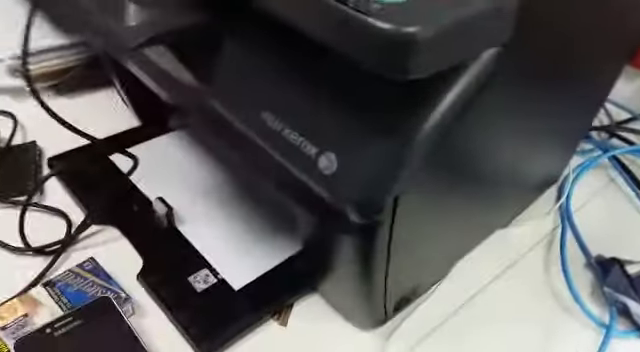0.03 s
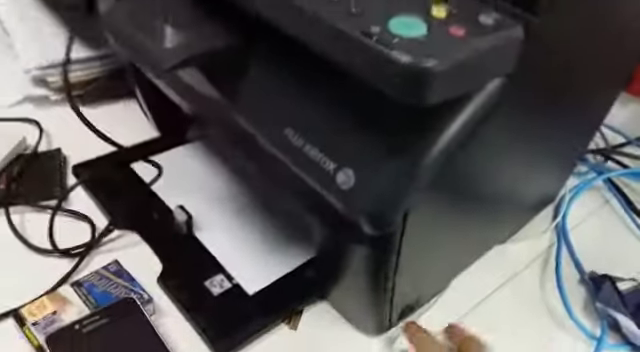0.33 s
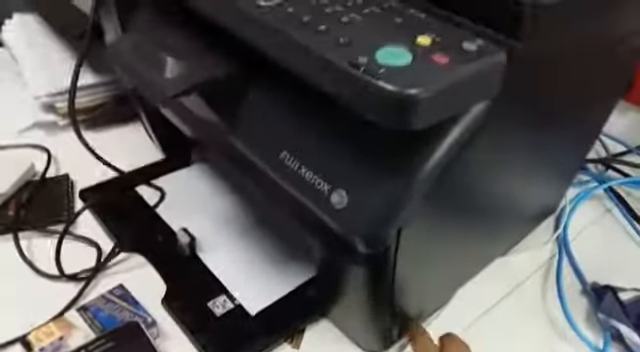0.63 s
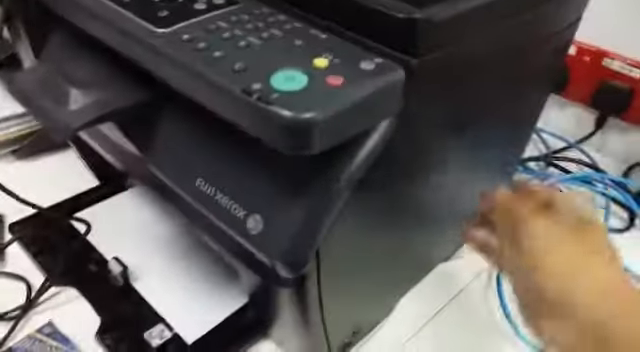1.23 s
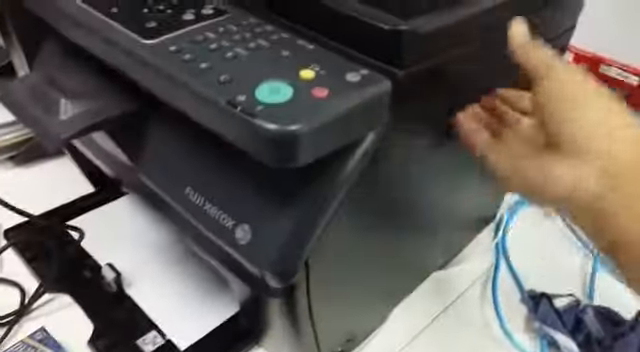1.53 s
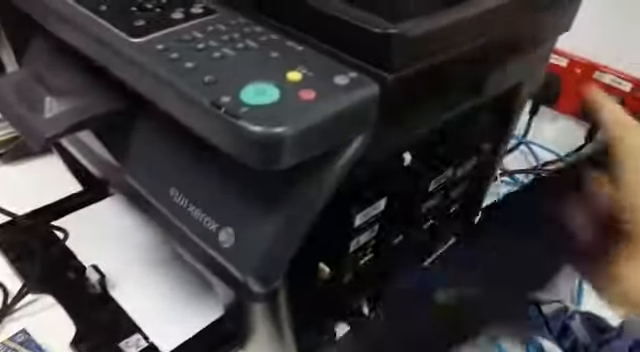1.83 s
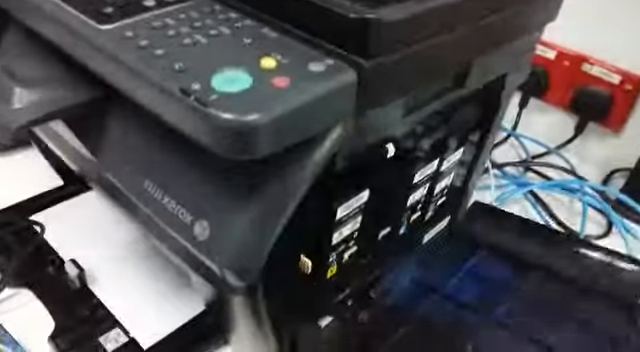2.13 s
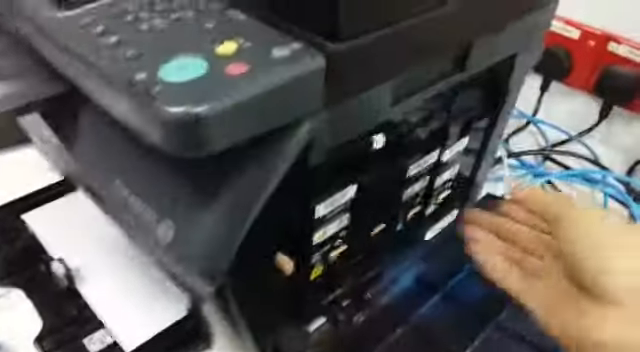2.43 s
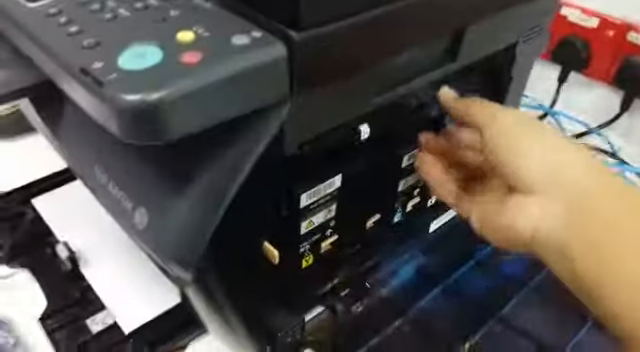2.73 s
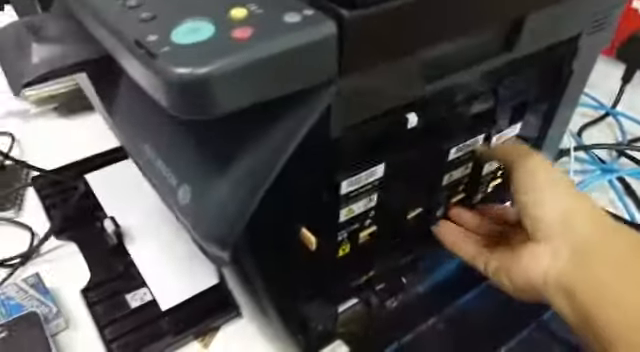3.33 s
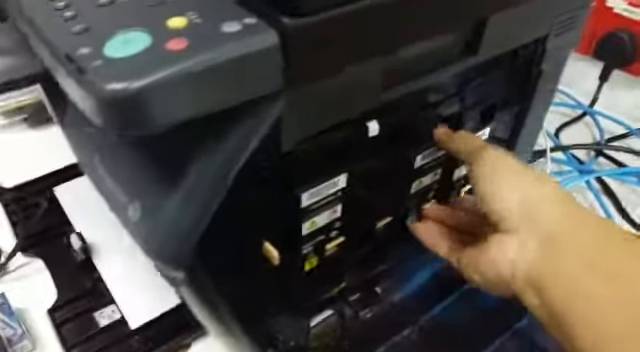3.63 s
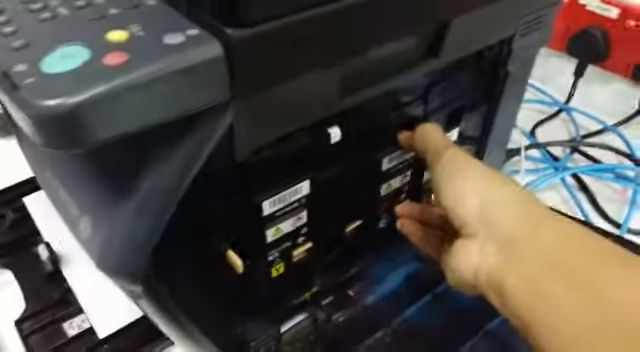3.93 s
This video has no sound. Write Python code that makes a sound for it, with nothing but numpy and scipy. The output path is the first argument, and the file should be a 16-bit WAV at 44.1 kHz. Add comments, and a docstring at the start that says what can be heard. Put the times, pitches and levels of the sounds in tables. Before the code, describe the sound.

A jammed printer's gears grind loudly, then stop, and its plastic panel clatters open.

```python
"""A jammed office printer's drive gear skips 47 teeth a second, rattling the plastic case, then stalls.
A hand unlatches the side panel, which swings down and knocks against its stop; fingers tick and rub
inside and a lever snaps over. A small room answers. Air hisses throughout; a low rumble fades away
and returns once the panel is open."""
import sys
import numpy as np
from scipy import signal
from scipy.fft import rfft, irfft, next_fast_len
from scipy.io import wavfile

SR = 44100
rng = np.random.default_rng(int(sys.argv[2]) if len(sys.argv) > 2 else 0)


def wav_out(sig):
    """Save sig, one row per channel (or a flat mono array), as 16-bit PCM at SR to the path in sys.argv[1]."""
    wavfile.write(sys.argv[1], SR, np.round(np.clip(np.atleast_2d(sig).T, -1, 1) * 32767).astype(np.int16))


N = 176400
FFT_N, RESPONSE_N = next_fast_len(N + SR), SR // 2
HZ = np.fft.rfftfreq(FFT_N, 1 / SR)
TIME_S, AGE_S = np.arange(N) / SR, np.arange(RESPONSE_N) / SR

# room decay: f/Hz, t60/s
ROOM_T60_S = [(150, 0.13), (600, 0.21), (4000, 0.17), (12000, 0.16)]
# left-right likeness: f/Hz, correlation
COHERENCE = [(100, 0.95), (300, 0.93), (600, 0.61), (1200, 0.14), (4000, 0.15)]
# air spectrum: f/Hz, level/dB
AIR_EQ = [(25, -32), (70, 1.5), (130, 3.5), (500, 7), (900, 3), (1700, -4), (2500, -4.5), (3400, -12.5),
          (5200, -16.5), (6500, -29), (9000, -35), (15800, -39)]
# rumble spectrum: f/Hz, level/dB
RUMBLE_EQ = [(25, -41), (65, -0.5), (115, 4.5), (170, -1), (300, 0.5), (600, -9), (1200, -16), (2500, -68)]
# rumble envelope: t/s, level/dB
RUMBLE_DB = [(0, -47.5), (2.38, -60), (2.44, -45.5), (2.62, -46), (2.7, -42), (2.95, -45.5), (3.3, -44.5),
             (4, -43)]
# hand and hinge rub spectrum: f/Hz, level/dB
RUB_EQ = [(300, -16), (1500, 8.5), (1850, 0), (2250, 7.5), (3000, 2), (4450, 0), (5400, -5), (6500, -7),
          (9000, -25.5), (15000, -29)]
# rub envelope: t/s, level/dB
RUB_DB = [(1.5, -72), (1.64, -45), (1.69, -56), (1.87, -54.5), (2.06, -48.5), (2.3, -58.5), (3.15, -71),
          (3.33, -50), (3.46, -53), (3.58, -55), (3.8, -58), (3.94, -57), (3.97, -45)]
# finger ticks: t/s, level/dB, treble/dB
FINGER_TICKS = [(2.6898, -9.5, -20), (2.7513, -19.5, -22), (3.17, -19, -7), (3.298, -17, -9),
                (3.5782, -22, 1), (3.712, -19.5, -10), (3.8486, -9.5, -4)]
# lever snap and rebound: t/s, level/dB
LEVER_HITS = [(3.8545, 6), (3.8554, 6.5), (3.8574, -1)]
# lever spectrum: f/Hz, level/dB
LEVER_EQ = [(100, -47), (300, -20), (900, -9), (1400, -8.5), (1820, -7.5), (2060, 0.5), (2330, -6),
            (2750, -7), (3150, -2), (4500, -7), (5150, -2.5), (6200, -15.5), (8200, -22.5), (15800, -38)]
# case modes under the lever: f/Hz, level/dB, t60/s
CASE_MODES = [(118, -38, 0.55), (174, -37.5, 0.22), (242, -15.5, 0.071), (277, -34.5, 0.34)]
# panel knocks: t/s, level/dB, bass/dB, treble/dB, rattle t60/s, ring/dB
PANEL_KNOCKS = [(1.5016, -1.5, -21, -10, .12, -14), (1.513, -7, -5, -6, 0.029, -10),
                (1.594, -12, -5, -15, 0.068, -6.5), (1.650, -17.5, -23, -6, 0.068, 1.5),
                (1.725, -12, -15, 3, 0.2, -4.5), (1.737, -17, -19, 5.5, 0.041, 3),
                (1.783, -9, 1.5, -7, 0.056, -3), (1.817, -18, -11, -5, 0.08, -5),
                (1.8878, -5, 0, -6.5, .12, -11), (2.083, -6.5, -18, 10, .052, -12),
                (2.0998, -2, 0.5, -2, 0.048, -0.5), (2.1416, 0, 2, 18.5, .042, -10),
                (2.17, -10.5, 1, -4, 0.023, 0), (2.178, 2, -5, -3, 0.038, 1),
                (2.3278, -13, 0.5, -6, 0.075, 2)]
# panel clatter spectrum: f/Hz, level/dB
PANEL_EQ = [(60, -27), (250, -5), (800, 2.5), (1200, -2), (2300, -8), (3500, -10.5), (4400, -9),
            (9000, -32), (15000, -53)]
# hollow panel modes: f/Hz, width/Hz, level/dB
SHELL_MODES = [(805, 60, 2), (1432, 50, -3), (1560, 50, -5), (1850, 40, -8), (2210, 60, -3),
               (4630, 130, -14)]
# gear speed: t/s, tooth rate/Hz
TOOTH_RATE_HZ = [(0, 47.7), (.1, 47.7), (.13, 47.05), (.3, 47.15), (.36, 47.45), (.72, 47.55), (.8, 47.3),
                 (1.07, 47.2)]
# gear load: t/s, level/dB
LOAD_DB = [(0, -.7), (1.1, .5)]
# last slips at the stall: t/s, level/dB
STALL_SLIPS = [(1.085, -1), (1.1279, 0)]
# gear frame modes: f/Hz, width/Hz, level/dB
FRAME_MODES = [(1000, 90, -8), (1180, 120, -12), (1400, 70, -1), (1520, 50, 1.5), (1820, 60, -6),
               (2100, 80, -8), (2440, 60, -1), (2550, 60, 2), (3680, 120, -6)]
# tooth chirp filter: f/Hz, level/dB
CHIRP_EQ = [(2550, 0), (3100, -7), (3650, 0)]
# tooth snap spectrum: f/Hz, level/dB
SNAP_EQ = [(60, -57), (1100, -1), (1700, -3), (3000, -0.5), (4200, -3), (5050, -0.5), (5700, -2),
           (6700, -4.5), (7500, -10.5), (7900, -11), (10500, -18), (13000, -17), (15800, -36)]
# tooth scrape spectrum: f/Hz, level/dB
GRIT_EQ = [(30, -30), (250, -15.5), (700, -1), (1500, 1), (2500, -3.5), (7200, -4), (8000, -10.5),
           (15800, -26.5)]
# thin ring after each rebound: t/s, level/dB
SQUEAL_DB = [(0, -33), (.7, -27), (.95, -19.5), (1.13, -18)]
# case drone: multiple of tooth rate, level/dB
DRONE_ORDERS = [(2, -14), (3, -4.5), (4, -15), (5, 0), (6, -4), (7, -6), (8, -13), (9, -14), (10, -6),
                (11, -5), (12, -13), (13, -5), (14, -4), (15, -8), (16, -10), (17, -11), (18, -5), (19, -2),
                (20, -8), (21, -4)]
# gear balance: f/Hz, left minus right/dB
GEAR_PAN_DB = [(700, 3), (1400, -2), (2600, -4), (3700, -3.5), (5000, 3.5), (6700, 6.5), (9000, 4.5),
               (13000, 8)]


def amp(db):
    """dB to gain."""
    return 10 ** (np.asarray(db) / 20)


def unit(x):
    """Scale to rms 1."""
    return x / np.sqrt(np.mean(np.abs(x) ** 2) + 1e-20)


def over_hz(rows, hz=HZ):
    """Interpolate on a log frequency axis."""
    f, value = np.transpose(rows)
    return np.interp(np.log(hz + 1), np.log(f + 1), value)


def over_time(rows, t_s=TIME_S):
    """Interpolate in time."""
    return np.interp(t_s, *np.transpose(rows))


def decay(t60_s, t_s=AGE_S):
    """Exponential decay."""
    return np.exp(-np.log(1000) * t_s / np.maximum(t60_s, 1e-4))


def min_phase(db):
    """Causal unit-energy response from a gain curve."""
    cepstrum = irfft(np.log(unit(amp(db)) + 1e-6), FFT_N)
    cepstrum[1:FFT_N // 2] *= 2
    cepstrum[FFT_N // 2 + 1:] = 0
    return np.exp(rfft(cepstrum))


def resonances(modes):
    """Causal response of modes with alternating sign."""
    return sum((-1) ** k * amp(db) * 1j * HZ * width / (hz * hz - HZ * HZ + 1j * HZ * width)
               for k, (hz, width, db) in enumerate(modes))


def shelves_db(bass_db, treble_db):
    """Gain curve of a softer or harder contact."""
    return over_hz([(700, bass_db), (2000, 0), (3000, 0), (8000, treble_db)])


def pan(db):
    """Stereo gains from left minus right."""
    return unit(amp(np.array([db, -db]) / 2).reshape(2, -1))


def spread(spectra):
    """Two unrelated spectra to stereo, alike in the bass."""
    angle = np.arccos(np.clip(over_hz(COHERENCE), -1, 1)) / 2
    mid, side = spectra[0] * np.cos(angle), spectra[1] * np.sin(angle)
    return np.array([mid + side, mid - side])


def samples(spectrum):
    """Spectrum to samples."""
    return irfft(spectrum, FFT_N)[..., :N]


def pulses(times_s, gains):
    """Spectrum of sharp contacts, as windowed sincs."""
    centres = np.asarray(times_s)[:, None] * SR
    taps = np.floor(centres).astype(int) + np.arange(-7, 9)
    weights = np.sinc(taps - centres) * np.sinc((taps - centres) / 8) * np.asarray(gains)[:, None]
    return rfft(np.bincount((taps % FFT_N).ravel(), weights.ravel(), FFT_N))


def noise(eq):
    """Steady stereo noise, rms 1."""
    white = spread(rfft(rng.standard_normal((2, FFT_N))))
    return unit(samples(white * amp(over_hz(eq))))


def rattle(t60_s, room_db, swell_s=0.0067):
    """Stereo response to one blow: dense rattle plus room tail."""
    rise = 1 - decay(swell_s)
    near = rng.standard_normal((2, RESPONSE_N)) * decay(t60_s) * rise
    for _ in range(3):  # whiten, then restore a decaying shape
        spectrum = rfft(near)
        flat = irfft(spectrum / (np.abs(spectrum) + 1e-9), RESPONSE_N)
        near = flat * (AGE_S < RESPONSE_N / SR / 2) * decay(10 * t60_s) * rise
    hz, t_s, bands = signal.stft(rng.standard_normal((2, RESPONSE_N)), SR, nperseg=256)
    bands = bands * decay(over_hz(ROOM_T60_S, hz)[:, None], t_s)
    tail = signal.istft(bands, SR, nperseg=256)[1][:, :RESPONSE_N] * (1 - decay(0.051))
    return unit(spread(rfft(unit(near) + amp(room_db) * unit(tail), FFT_N)))


def background(air_db=-46, hum_hz=120.7, hum_db=-61):
    """Room air, faint hum, low rumble."""
    air = amp(air_db) * noise(AIR_EQ)
    hum = amp(hum_db) * np.sin(2 * np.pi * hum_hz * TIME_S)
    rumble = amp(over_time(RUMBLE_DB)) * noise(RUMBLE_EQ)
    return air + hum + rumble


def rubbing():
    """Hand and hinge rub on plastic."""
    return amp(over_time(RUB_DB)) * noise(RUB_EQ)


def lever():
    """Fingers tick on a plastic lever; it snaps over and thumps the case."""
    eq_db = over_hz(LEVER_EQ)
    ticks = sum(pulses([t_s], [amp(db)]) * min_phase(eq_db + shelves_db(0, treble_db))
                * rattle(t60_s=0.019, room_db=-8.5) for t_s, db, treble_db in FINGER_TICKS)
    snap = sum(pulses([t_s], [amp(db)]) * rattle(t60_s=0.0115, room_db=-6.5, swell_s=0.0024)
               for t_s, db in LEVER_HITS) * min_phase(eq_db)
    ring = sum(amp(db) * np.sin(2 * np.pi * hz * AGE_S) * decay(t60_s) for hz, db, t60_s in CASE_MODES)
    thump = pulses([LEVER_HITS[0][0]], [1]) * rfft(ring * (1 - decay(0.052)), FFT_N)
    return samples((ticks + snap) * pan(db=-1) + thump)


def panel(shell_rattle_db=-5):
    """The panel unlatches and bounces on its stop; each knock rattles it and rings its hollow shell."""
    shell, knocks = resonances(SHELL_MODES), 0
    for t_s, db, bass_db, treble_db, t60_s, ring_db in PANEL_KNOCKS:
        contact = min_phase(shelves_db(bass_db, treble_db))
        colour = unit(contact * min_phase(over_hz(PANEL_EQ)))
        clatter = colour * rattle(t60_s, room_db=-4, swell_s=0.0074)
        ring = unit(contact * shell) * (1 + amp(shell_rattle_db) * rattle(t60_s, room_db=-7))
        knocks = knocks + pulses([t_s], [amp(db)]) * (clatter + amp(ring_db) * ring)
    return samples(knocks * pan(db=-2.5))


def case_drone(teeth, t60_s=0.42):
    """The case drones at multiples of the tooth rate, dying away at the stall."""
    drone = 0
    for order, db in DRONE_ORDERS:
        cycles = order * teeth + rng.random()
        stereo_offset = np.array([[0], [order * 0.0096]]) * rng.normal()
        drone = drone + amp(db) * np.sin(2 * np.pi * (cycles + stereo_offset))
    return drone * decay(t60_s, np.maximum(TIME_S - STALL_SLIPS[0][0], 0))


def tooth_chirp(start_hz=2150, end_hz=5400, length_s=0.005):
    """Spectrum of the rising chirp as one tooth rides over the next."""
    progress = np.minimum(AGE_S / length_s, 1)
    hz = start_hz + (end_hz - start_hz) * progress
    envelope = np.sqrt(np.abs(np.sin(np.pi * progress))) * (1 - progress / 2)
    sweep = np.sin(2 * np.pi * np.cumsum(hz) / SR) * envelope
    return unit(rfft(sweep, FFT_N) * amp(over_hz(CHIRP_EQ)))


def frame_strike(hits, direct, highpass_hz=900):
    """Teeth ring and rattle the gear frame."""
    highpass = (1j * HZ / (highpass_hz + 1j * HZ)) ** 2
    frame = unit(resonances(FRAME_MODES) * highpass)
    return hits * frame * (direct + amp(-6) * rattle(t60_s=0.016, room_db=-0.5, swell_s=0.0025))


def tooth_snap(hits, wall_lag_s=0.0095, wall_db=-11.5):
    """Bright snap with one wall reflection."""
    snap = hits * min_phase(over_hz(SNAP_EQ)) * rattle(t60_s=0.026, room_db=5, swell_s=0.0025)
    return snap * pulses([0, wall_lag_s], [1, amp(wall_db)])


def tooth_squeal(hits, direct, hz=5020):
    """Thin ring after each rebound."""
    ring = rfft(np.sin(2 * np.pi * hz * AGE_S) * decay(t60_s=0.025), FFT_N)
    return hits * ring * (direct + rattle(t60_s=0.026, room_db=0))


def tooth_scrape(hits):
    """One burst of gritty noise per tooth."""
    envelope = unit(np.abs(samples(hits * rfft(decay(t60_s=0.066), FFT_N))))
    grit = rfft(envelope * rng.standard_normal((2, N)), FFT_N)
    return spread(grit) * min_phase(over_hz(GRIT_EQ))


def gear(first_s=0.005, stall_s=1.07, snap_lag_s=0.0013, rebound_lag_s=0.0037, ear_lag_s=0.00013):
    """Each skipping tooth chirps, strikes the frame, snaps, rebounds and scrapes; the case drones."""
    teeth = np.cumsum(over_time(TOOTH_RATE_HZ)) / SR
    count = int(teeth[int(stall_s * SR)]) + 1
    skips_s = first_s + np.interp(np.arange(count), teeth, TIME_S)
    late_s, late_db = np.transpose(STALL_SLIPS)
    gains = amp(np.r_[over_time(LOAD_DB, skips_s), late_db])
    skips_s = np.r_[skips_s, late_s]

    def hits(lag_s, jitter_s, db=0, scatter_db=0.3):
        """One pulse per skip, scattered in time and level."""
        timing, level = rng.standard_normal((len(skips_s), 2)).T
        return pulses(skips_s + lag_s + jitter_s * timing, gains * amp(db + scatter_db * level))

    direct = np.exp(1j * np.pi * HZ * ear_lag_s * np.array([[1], [-1]]))
    chirp = amp(1) * hits(0, jitter_s=40e-6) * tooth_chirp()
    strike = amp(4) * frame_strike(hits(0, jitter_s=40e-6) * pulses([snap_lag_s], [1]), direct)
    snap_hits = hits(snap_lag_s, jitter_s=10e-6) + hits(rebound_lag_s, jitter_s=20e-6, db=-2.5)
    snap = amp(2.5) * tooth_snap(snap_hits)
    squeal = tooth_squeal(hits(rebound_lag_s, jitter_s=20e-6, db=over_time(SQUEAL_DB, skips_s)), direct)
    scrape = amp(-32) * tooth_scrape(hits(snap_lag_s, jitter_s=185e-6))
    skipping = (chirp + strike + snap + squeal + scrape) * pan(over_hz(GEAR_PAN_DB))
    return samples(skipping) + amp(-36) * case_drone(teeth)


def scene():
    """Stereo sum of all sources."""
    return gear() + panel() + lever() + background() + rubbing()


def record(dry, cutoff_hz=15850):
    """Brick-wall low-pass."""
    return samples(rfft(dry, FFT_N) * (HZ < cutoff_hz))


dry = scene()
out = record(dry)
wav_out(out)
```